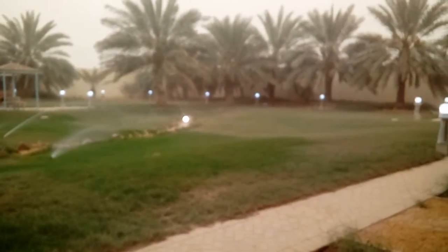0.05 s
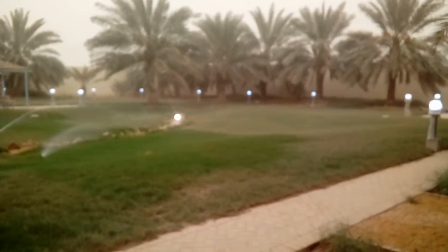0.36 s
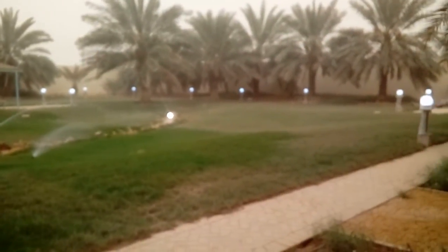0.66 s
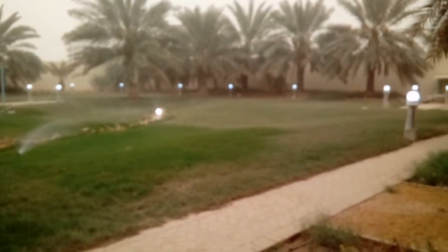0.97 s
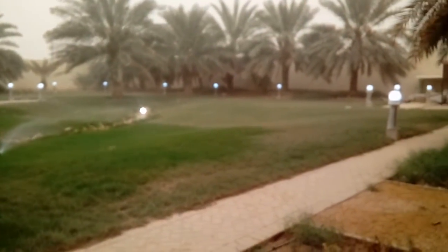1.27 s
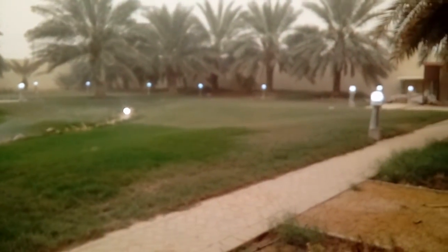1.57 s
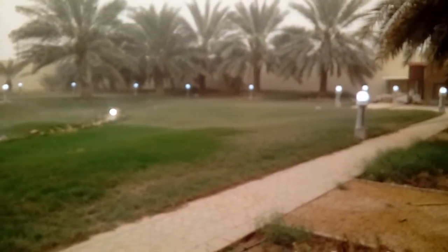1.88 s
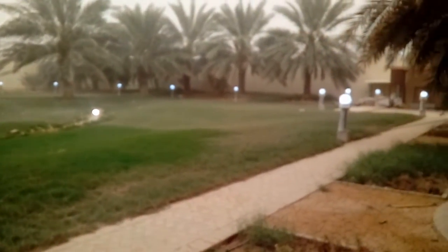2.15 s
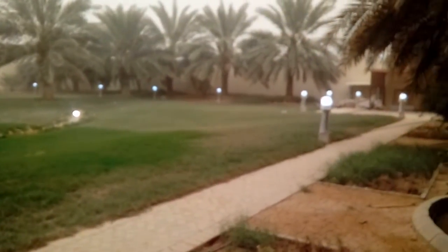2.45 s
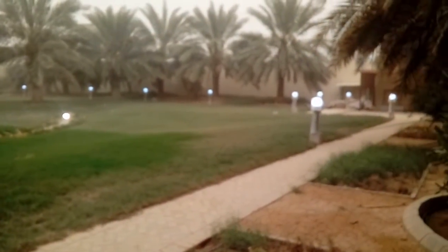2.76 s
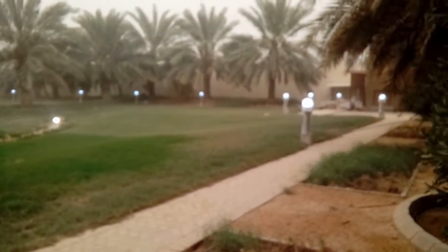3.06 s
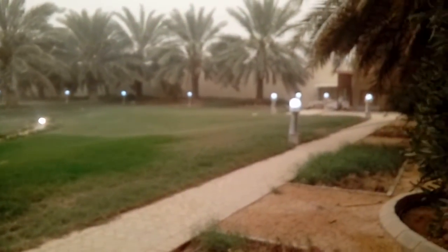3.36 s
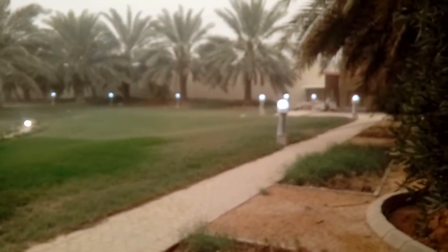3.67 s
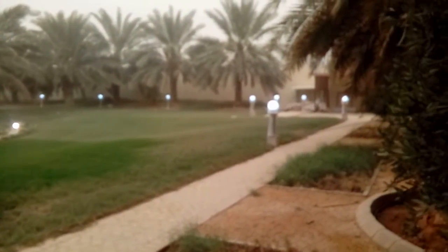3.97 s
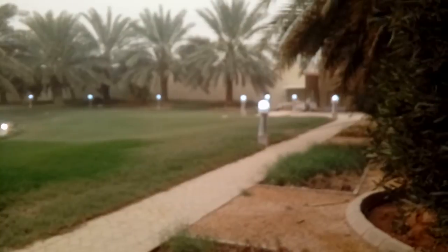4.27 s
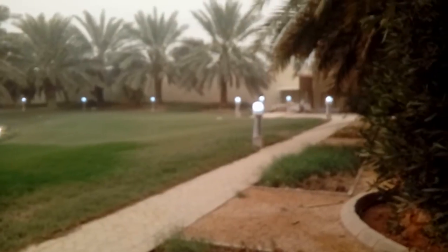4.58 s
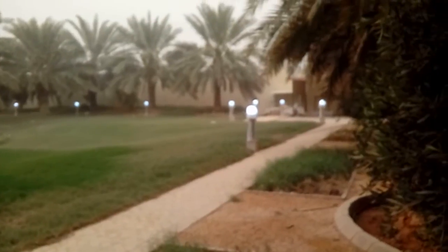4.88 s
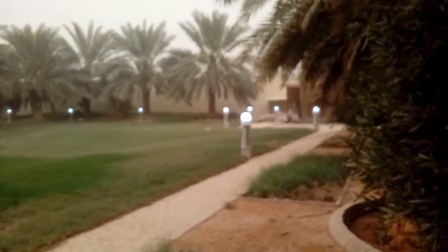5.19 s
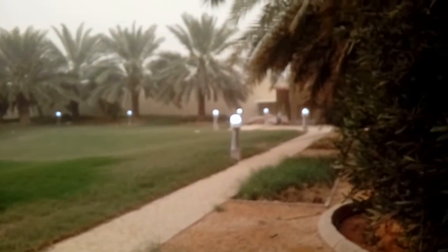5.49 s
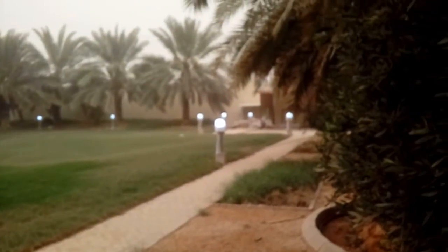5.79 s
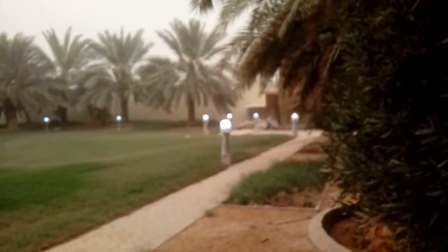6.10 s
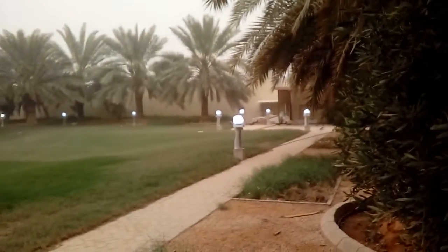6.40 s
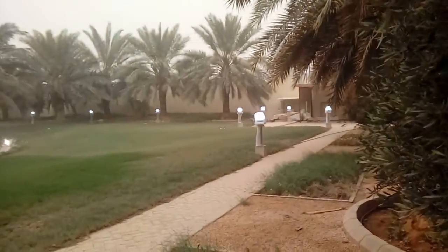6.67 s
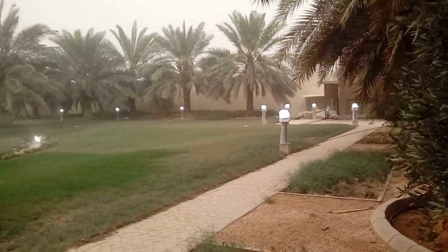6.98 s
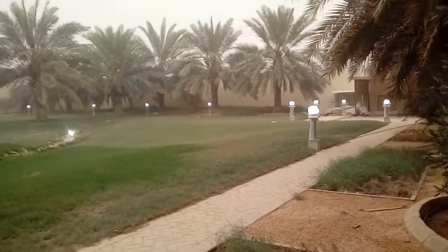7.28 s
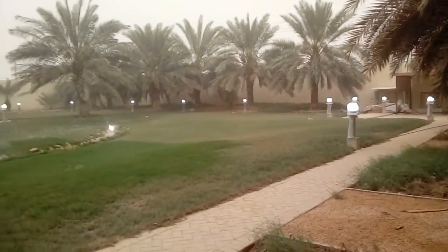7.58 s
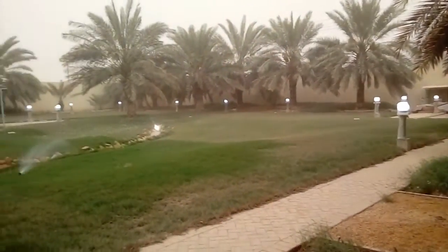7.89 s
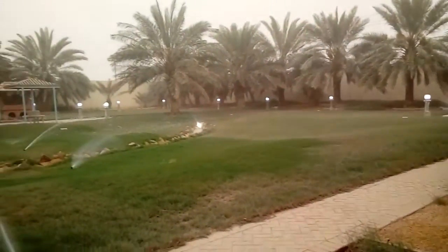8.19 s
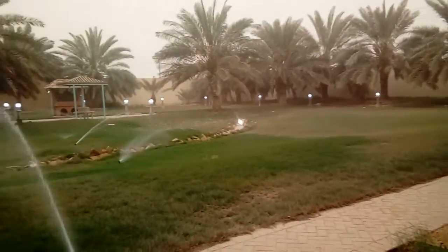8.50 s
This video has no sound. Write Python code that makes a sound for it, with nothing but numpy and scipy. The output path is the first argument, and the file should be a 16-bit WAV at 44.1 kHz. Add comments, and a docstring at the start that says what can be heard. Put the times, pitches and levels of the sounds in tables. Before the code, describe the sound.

Outdoors on a lawn, water sprays from sprinklers with an even hiss and a light patter. Wind flutters on the microphone, builds to a burst of loud buffeting, and fades to occasional light puffs. Birds in the trees pip now and then, whistle three clear calls near the middle, and scold in short raspy series through the second half, with a faint echo.

```python
"""Sprinklers in a palm garden

Lawn sprinklers hiss and their spray patters on the grass, over a faint rumble from far off.
A gust buffets the microphone in short puffs, and the recorder's limiter ducks under the hardest.
Small birds chirp and scold from the trees, answered faintly by the garden wall. The sound is mono."""
import sys
import numpy as np
from scipy import signal
from scipy.fft import rfft, irfft, next_fast_len
from scipy.io import wavfile
from scipy.ndimage import uniform_filter1d, minimum_filter1d, map_coordinates

SR = 44100
rng = np.random.default_rng(int(sys.argv[2]) if len(sys.argv) > 2 else 0)


def digitize_waveform(pressure):
    """Quantize a signal to 16-bit integers and store it at the path in sys.argv[1].

    Rows of a 2-D input are taken as channels; values are limited to [-1, 1].
    """
    field = np.atleast_2d(pressure).T
    bounded = np.clip(field, -1, 1)
    quanta = np.round(bounded * 32767).astype(np.int16)
    wavfile.write(sys.argv[1], SR, quanta)


N = 381465

# The sprinklers at the microphone. Each row: time in seconds, patter in dB, nozzle hiss in dB.
SPRINKLER_LEVELS = [(0, -51, -40.5), (1.4, -48, -40.5), (2.2, -46, -41.5), (3.1, -44.5, -40),
                    (5.2, -46, -39.5), (5.7, -47, -41.5), (6.3, -48.5, -40), (8.65, -54.5, -40)]
# Spectra of the jets, the spray on the grass, the slow eddies and the microphone port.
# Each row: frequency in Hz, relative level in dB.
NOZZLE_SPECTRUM = [(150, -53), (400, -23), (1000, -20), (2000, -10.5), (3200, -9.5), (4600, -4),
                   (5700, -1.14), (6700, 0.5), (7900, -10.5), (9000, -14), (11000, -23.5), (12500, -36.5),
                   (13900, -41), (15000, -36)]
PATTER_SPECTRUM = [(100, -79), (250, -17.5), (450, -8.5), (750, -1.5), (1050, 2), (1500, 0), (2300, -2),
                   (4000, -4), (7000, -28), (12000, -47)]
EDDY_SPECTRUM = [(10, -26), (22, -22), (36, -14.5), (55, -2), (85, 3), (120, -.5), (160, -9), (212, -33.5),
                 (260, -23.5), (400, -22.5), (800, -69)]
PORT_SPECTRUM = [(60, -16.5), (150, -6.5), (212, -34), (260, -9), (340, -1.5), (550, 4.5), (800, 5.5),
                 (1000, 2.5), (3000, -2.5), (6000, -5), (10000, -32)]
# The main gust rises, eases, comes back and dies away. Each row: time in seconds, rumble in dB.
MAIN_GUST = [(0, -53), (.55, -61.5), (.7, -50), (1.36, -52.5), (1.47, -34.5), (1.95, -36.5), (2.1, -28.5),
             (2.42, -32), (2.6, -27), (2.9, -33.5), (3.17, -43), (3.4, -38.5), (3.85, -37), (4.2, -38.5),
             (4.85, -49), (5.4, -64.5), (5.75, -50.5), (6.05, -62), (8.65, -56)]
# Light gusts before and after it.
# Each row: peak time in seconds, rumble in dB, flutter in dB, half-length in seconds.
LIGHT_GUSTS = [(0.074, -48, -48, 0.017), (0.184, -42, -47, 0.018), (0.273, -40.5, -46, 0.024),
               (0.843, -49, -53, 0.083), (1.01, -41, -51, 0.02), (5.14, -51, -57, .04),
               (6.35, -46.5, -63, 0.036), (6.562, -44, -61, 0.017), (7.12, -49.5, -72, 0.028),
               (7.622, -43, -47, 0.025), (7.877, -39, -48, 0.028), (8.597, -47.5, -56, .035)]
# Hard puffs right on the port. Each row: peak time in seconds, level in dB, half-length in seconds.
HARD_PUFFS = [(1.459, -18, 0.0066), (1.561, -24, 0.004), (1.585, -15.5, 0.0032), (1.784, -22.5, 0.0081),
              (1.85, -23, .019), (2.026, -21.5, 0.0061), (2.103, -11, 0.0097), (2.13, -8, 0.0095),
              (2.249, -9.5, 0.017), (2.277, -10, 0.0032), (2.343, -11.5, 0.018), (2.388, -19, 0.0084),
              (2.485, -9.5, 0.015), (2.508, 7, 0.0062), (2.534, 1, .011), (2.577, -8, 0.016),
              (2.675, -15, 0.0042), (2.732, -13.5, .014), (2.787, -7.5, 0.011), (2.827, -26.5, 0.021),
              (2.979, -30, .007), (3.331, -20, 0.009), (3.406, -20, 0.011), (3.434, -20, 0.004),
              (3.472, -25, 0.019), (3.626, -25, 0.01), (3.683, -12.5, 0.0072), (3.752, -25, 0.0099),
              (3.863, -20.5, 0.023), (4.317, -24, 0.0068), (4.384, -28, 0.0081), (4.564, -37, 0.0047)]
# Short falling pips from the trees. Each row: start in seconds, starting pitch in Hz, level in dB.
FALLING_PIPS = [(1.082, 2500, -42.5), (1.205, 2290, -45), (1.338, 2060, -47.5), (3.268, 2310, -41),
                (4.476, 2300, -42), (4.606, 2130, -40.5), (6.793, 2140, -47), (6.916, 2165, -42.5),
                (7.044, 2060, -49), (7.201, 1970, -47), (7.994, 4040, -44)]
# The songbird's arched calls. Each row: time in seconds, pitch in Hz, level in dB.
SONG_CALLS = [(3.173, 2817, -33), (3.42, 2700, -32.5), (3.672, 2734, -32)]
# One call: a thin lead-in, a clear rise, a trilled top and a fall. Each row: delay in seconds,
# length in seconds, start and end pitch as ratios, relative level in dB, trill depth in Hz.
CALL_PARTS = [(-.062, 0.02, 1.1, 1.23, -9, 81), (0, 0.034, .995, 1.06, -2, 20),
              (.021, .034, 1.04, 1.125, 0.5, 190), (0.059, .032, 1.1, .92, -4, 200)]
# Bouts of evenly spaced scolding notes.
# Each row: first and last note in seconds, number of notes, level in dB, pitch in Hz.
SCOLD_BOUTS = [(1.536, 1.536, 1, -39, 2040), (1.689, 1.802, 2, -36.5, 2065), (1.966, 1.966, 1, -33.5, 2090),
               (5.066, 5.681, 7, -39, 2168), (5.77, 5.871, 2, -41.5, 2210), (6.037, 6.395, 4, -41.5, 2130),
               (6.628, 6.628, 1, -40, 2130), (7.846, 7.943, 2, -41.5, 2070), (8.104, 8.543, 5, -38.5, 2330)]
# The scolding bird's throat and beak. Each row: frequency in Hz, relative level in dB.
BEAK_SPECTRUM = [(900, -28), (1600, -7), (2100, -1), (2600, -10.5), (3400, -0.5), (4300, -4.5),
                 (5200, -8.5), (6500, -15), (9000, -43)]


def amp(db):
    """Decibels to gain."""
    return 10 ** (np.asarray(db) / 20)


def unit(x):
    """x at rms 1."""
    return x / np.sqrt(np.mean(x ** 2) + 1e-20)


def clock():
    """The time of each sample in seconds."""
    return np.arange(N) / SR


def curves(rows):
    """One value per sample for each column after the time."""
    times, *columns = np.transpose(rows)
    return [np.interp(clock(), times, column) for column in columns]


def wobble(rate):
    """A smooth random curve, rate knots a second."""
    return map_coordinates(rng.standard_normal(int(N * rate / SR) + 4), [clock() * rate])


def filtered(x, response):
    """x through a gain given as a function of frequency."""
    size = next_fast_len(N + 8192)
    return irfft(rfft(x, size) * response(np.fft.rfftfreq(size, 1 / SR)), size)[..., :N]


def coloured(x, points):
    """x through a spectrum of (Hz, dB) points on a log axis."""
    point_hz, db = np.transpose(points)
    return filtered(x, lambda hz: amp(np.interp(np.log(hz + 1), np.log(point_hz), db)))


def levelled(x, span_s):
    """x held at rms 1 over a sliding span."""
    return x / np.sqrt(np.abs(uniform_filter1d(x * x, int(span_s * SR) + 1)) + 1e-12)


def patchy(x, depth_db):
    """x with drifting patches of gain in time and frequency, at rms 1."""
    spectra = signal.stft(x, nperseg=512)[2]
    patches = uniform_filter1d(rng.standard_normal(spectra.shape), size=7, axis=0)
    patches = uniform_filter1d(patches, size=12, axis=1)
    return unit(signal.istft(spectra * amp(depth_db * unit(patches)), nperseg=512)[1][:N])


def droplets(per_s, spread_db, mist):
    """Impacts of drops of many sizes, over the even noise of the finest mist."""
    arrivals = rng.random(N) < per_s / SR
    hits = arrivals * rng.standard_normal(N) * amp(spread_db * rng.standard_normal(N))
    return unit(unit(hits) + mist * rng.standard_normal(N))


def sprinklers():
    """Jets tear into drops at the nozzles and land on the lawn."""
    lawn_db, nozzle_db = curves(SPRINKLER_LEVELS)
    spray = coloured(droplets(per_s=4000, spread_db=0.5, mist=1.6), NOZZLE_SPECTRUM)
    jets = patchy(spray, depth_db=0.62)
    splashes = coloured(droplets(per_s=1400, spread_db=1.0, mist=1.0), PATTER_SPECTRUM)
    lawn = patchy(splashes, depth_db=.7)
    return amp(nozzle_db + 0.31 * wobble(15)) * jets + amp(lawn_db + wobble(9.1)) * lawn


def far_rumble(level_db=-64):
    """The faint low rumble of the surroundings, far beyond the garden."""
    spectrum = [(15, -23), (40, -2), (70, -6.0), (120, -10), (220, -48), (800, -72)]
    return amp(level_db) * unit(coloured(rng.standard_normal(N), spectrum))


def wind(flutter_db=-41, growth=1.97, eddy_db=0.5):
    """Slow eddies rumble on the microphone all along; in the gust, puffs break into ragged flutter."""
    wind_db, = curves(MAIN_GUST)
    rumble_power = amp(wind_db + 1.4 * wobble(11)) ** 2
    # the flutter grows faster than the rumble as the wind picks up
    flutter_power = amp(flutter_db + growth * (wind_db + 35.5)) ** 2 * (1 + stray_puffs())
    t = clock()
    for peak_s, rumble_db, gust_flutter_db, half_s in LIGHT_GUSTS:
        swell = np.exp(-((t - peak_s) / half_s) ** 2 / 2)
        rumble_power += amp(rumble_db) ** 2 * swell
        flutter_power += amp(gust_flutter_db) ** 2 * swell ** growth
    eddies = amp(3.5 * wobble(45)) * coloured(rng.standard_normal(N), EDDY_SPECTRUM)
    rumble = amp(eddy_db) * np.sqrt(rumble_power) * levelled(eddies, span_s=0.068)
    flutter_power *= amp(0.73 * wobble(44) + 2.98 * wobble(250)) ** 2
    ragged = amp(2.5 * wobble(450)) ** 2
    flutter_power += ragged * sum(hard_puff(*row) for row in HARD_PUFFS)
    return rumble + port_flutter(10 * np.log10(flutter_power))


def port_flutter(level_db, corner_hz=852, doubling_db=20.0, steepness=4.03):
    """Turbulence in the microphone port: faster air is louder and sheds smaller, higher eddies."""
    noise = levelled(coloured(rng.standard_normal(N), PORT_SPECTRUM), span_s=0.0118)
    cutoff_hz = corner_hz * 2 ** ((level_db + 15) / doubling_db)
    flutter = np.zeros(N)
    for centre_hz in 100 * 2 ** (np.arange(14) / 2):  # half-octave bands
        band = filtered(noise, lambda hz: np.maximum(1 - 2 * np.abs(np.log2((hz + 1) / centre_hz)), 0))
        flutter += band / (1 + (centre_hz / cutoff_hz) ** steepness)
    return amp(level_db) * levelled(flutter, span_s=0.02)


def stray_puffs(per_s=20, level_db=6, spread_db=2.2, half_s=0.0054):
    """The power of weak puffs at random moments, relative to the steady flutter."""
    arrivals = rng.random(N) < per_s / SR
    powers = amp(level_db + spread_db * rng.standard_normal(N)) ** 2
    shape = signal.windows.gaussian(SR // 10, half_s * SR)
    return np.abs(signal.fftconvolve(arrivals * powers, shape, mode="same"))


def syllables(pip_s=0.029, pip_fall=0.043, pip_trill_hz=90):
    """One row for every whistle of the calls and pips."""
    calls = [(s + delay, length, hz * start, hz * end, db + part_db, depth_hz)
             for s, hz, db in SONG_CALLS
             for delay, length, start, end, part_db, depth_hz in CALL_PARTS]
    pips = [(s, pip_s, hz, hz * (1 - pip_fall), db, pip_trill_hz) for s, hz, db in FALLING_PIPS]
    return calls + pips


def chirps(trill_hz=125):
    """Gliding whistles from the trees, roughened by a fast trill."""
    song, quiver = np.zeros(N), wobble(500)
    for start_s, length_s, start_hz, end_hz, db, depth_hz in syllables():
        t = np.arange(int(length_s * SR)) / SR
        here = slice(int(start_s * SR), int(start_s * SR) + len(t))
        trill = np.sin(2 * np.pi * (trill_hz * t + rng.random())) + .5 * quiver[here]
        pitch = start_hz + (end_hz - start_hz) * t / length_s + depth_hz * trill
        swell = np.sqrt(2 * np.abs(np.sin(np.pi * t / length_s)))
        song[here] += amp(db) * swell * np.sin(2 * np.pi * np.cumsum(pitch) / SR)
    return song


def garden_echo(x, t60_s, build_s):
    """The wall and the palms scatter sound back to the microphone."""
    t = np.arange(SR) / SR
    tail = rng.standard_normal(SR) * amp(-60 * t / t60_s) * (1 - np.exp(-t / build_s))
    return signal.fftconvolve(x, tail / np.linalg.norm(tail))[:N]


def hard_puff(peak_s, db, half_s):
    """The power of one puff on the port: a sharp core inside a skirt of weaker eddies."""
    t, power = clock(), np.zeros(N)
    near = slice(max(int((peak_s - .15) * SR), 0), int((peak_s + .15) * SR))
    power[near] = amp(db) ** 2 / (1 + ((t[near] - peak_s) / half_s) ** 2 / 3) ** 4
    return power


def scolding(half_s=.0115, jitter=.057, rasp=.68, arch=.04):
    """A bird scolds from the trees: short, arched, raspy notes with a strong second harmonic."""
    notes, quiver = np.zeros(N), wobble(800)
    hiss = unit(coloured(rng.standard_normal(N), BEAK_SPECTRUM))
    t = np.arange(-SR // 20, SR // 20) / SR
    swell = np.exp(-(t / half_s) ** 2 / 2)
    for first_s, last_s, count, db, hz in SCOLD_BOUTS:
        for peak_s in np.linspace(first_s, last_s, round(count)):
            start = int((peak_s + t[0]) * SR)
            here = slice(start, start + len(t))
            pitch = hz * (1 + jitter * quiver[here] + arch * (swell - 1))
            phase = 2 * np.pi * np.cumsum(pitch) / SR
            voice = .38 * np.sin(phase) + np.sin(2 * phase)
            notes[here] += amp(db) * swell * (voice + rasp * hiss[here])
    return notes


def limiter(x, threshold_db, slope, lookahead_s, release_db_per_s):
    """The recorder turns its gain down just ahead of a loud puff, then brings it steadily back."""
    level_db = 10 * np.log10(np.abs(uniform_filter1d(x[0] ** 2, size=300)) + 1e-12)
    wanted_db = slope * np.minimum(threshold_db - level_db, 0)
    wanted_db = minimum_filter1d(wanted_db, 2 * int(lookahead_s * SR) + 1)
    recovery_db = release_db_per_s * clock()
    gain_db = np.minimum.accumulate(wanted_db - recovery_db) + recovery_db
    return x * amp(uniform_filter1d(gain_db, size=300))


def scene():
    """Water, birds and wind at one microphone in the garden, alike in both channels."""
    song, chatter = chirps(), scolding()
    echo = garden_echo(amp(-6.5) * song + amp(-15) * chatter, t60_s=.8, build_s=.02)
    return np.tile(sprinklers() + song + chatter + echo + wind() + far_rumble(), (2, 1))


def record(dry):
    """The recorder limits the gusts, rounds their peaks and keeps nothing above its band limit."""
    ceiling, top_hz = .95, 15750
    held = limiter(dry, threshold_db=-15.3, slope=.74, lookahead_s=.011, release_db_per_s=140)
    rounded = held / (1 + np.abs(held / ceiling) ** 6) ** (1 / 6)
    return filtered(rounded, lambda hz: hz < top_hz)


dry = scene()
out = record(dry)
digitize_waveform(out)
```